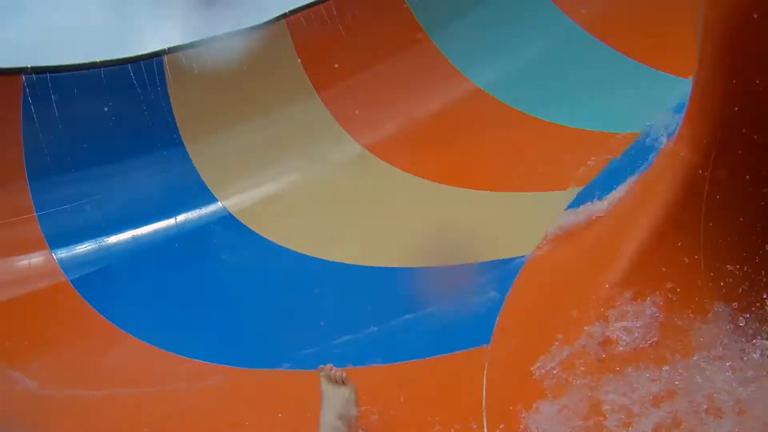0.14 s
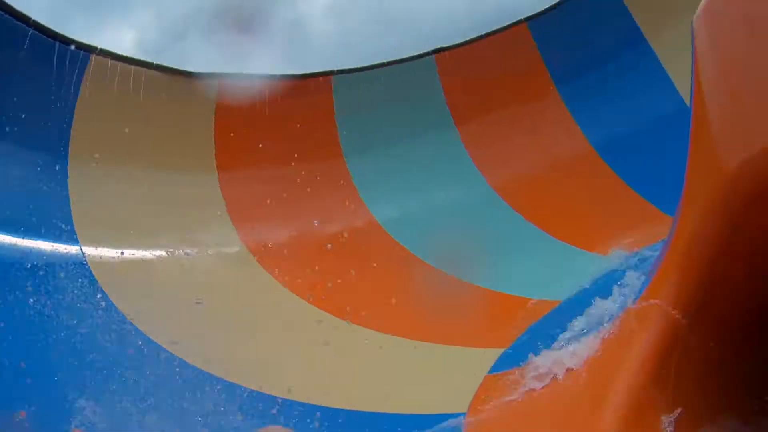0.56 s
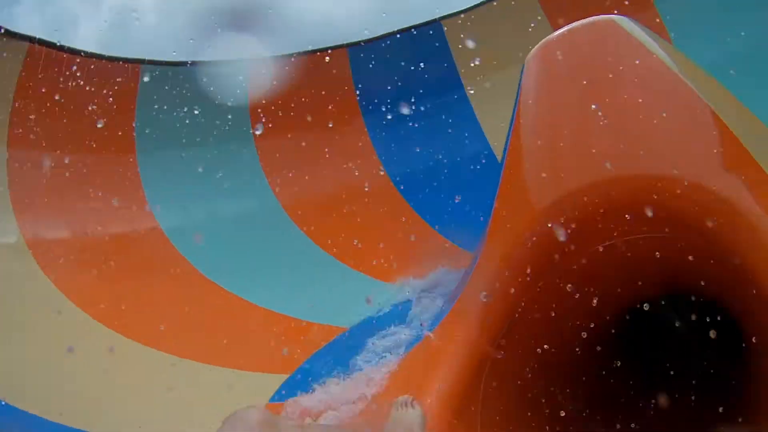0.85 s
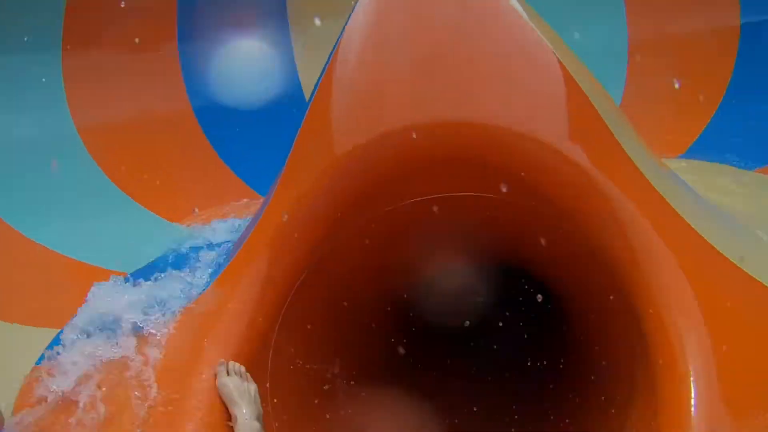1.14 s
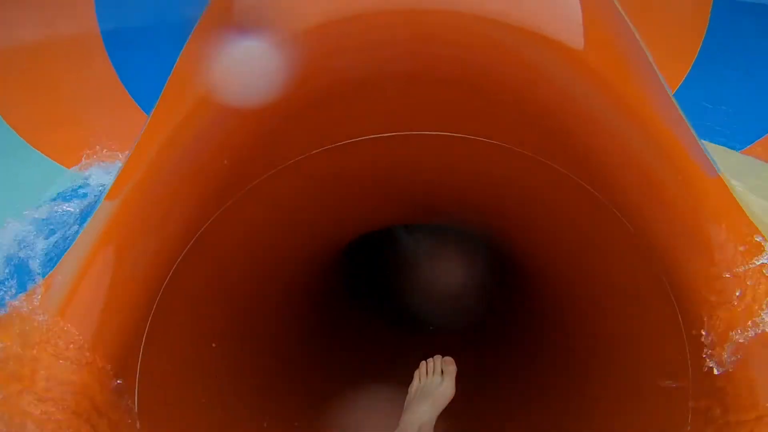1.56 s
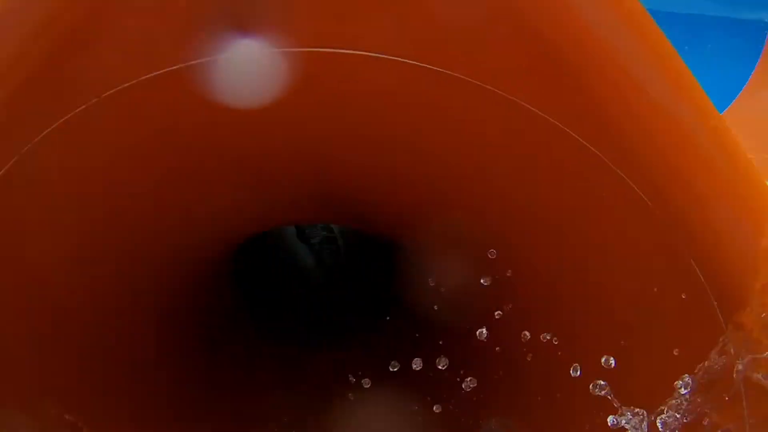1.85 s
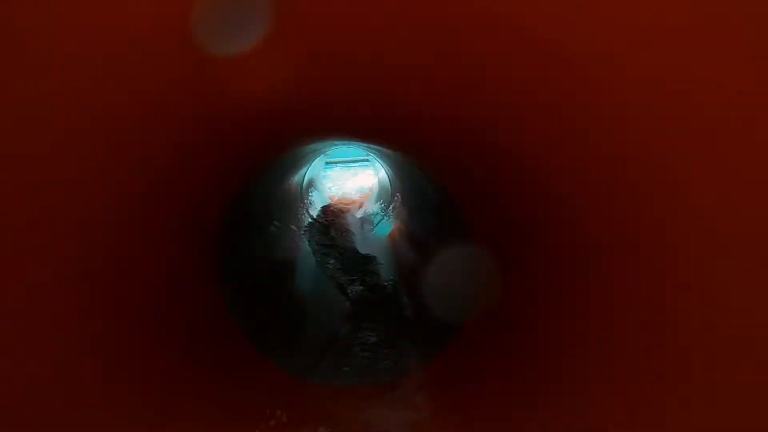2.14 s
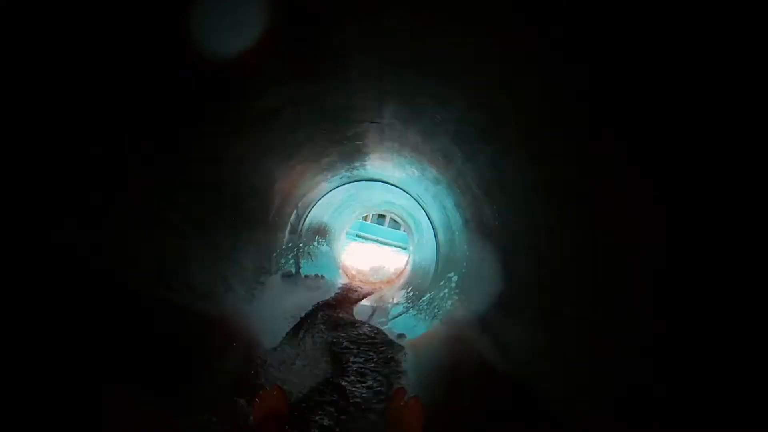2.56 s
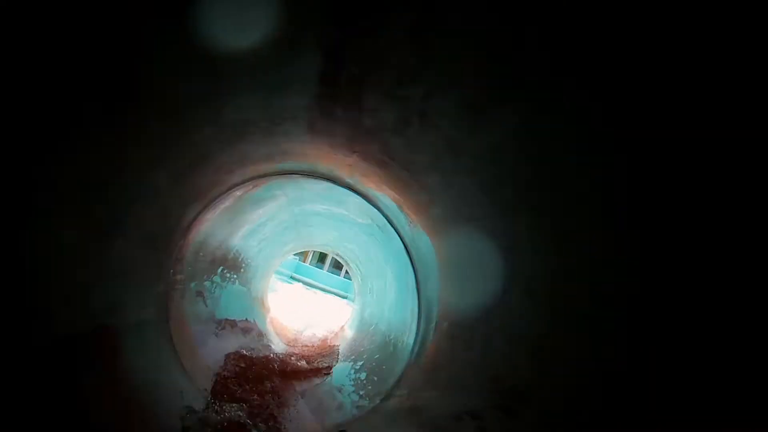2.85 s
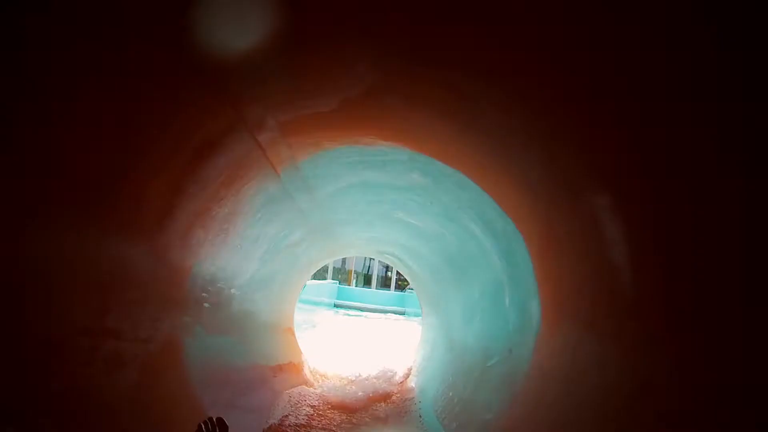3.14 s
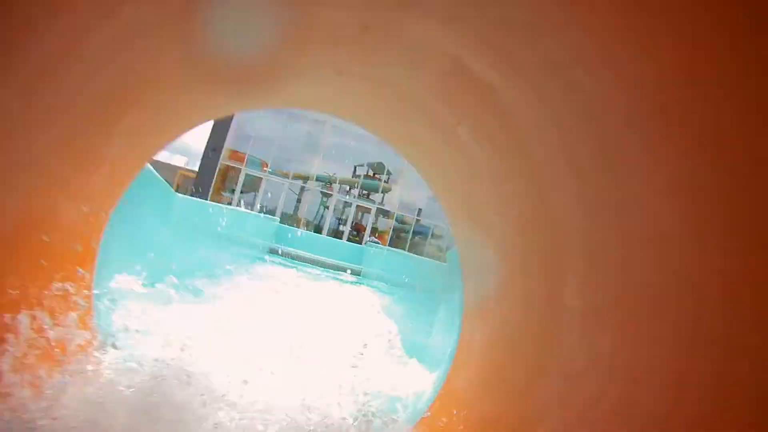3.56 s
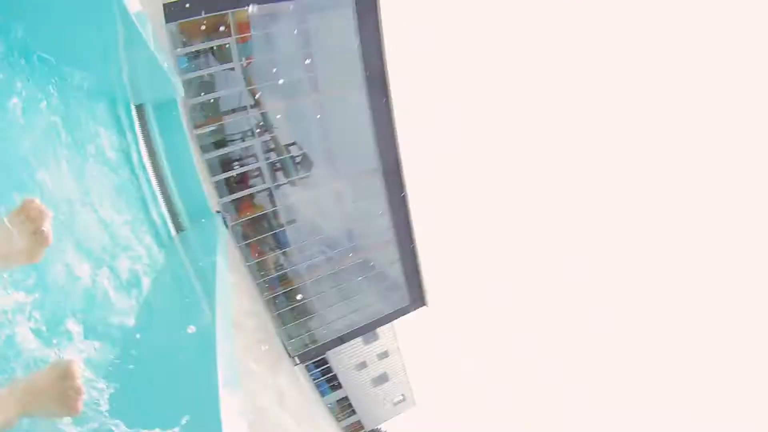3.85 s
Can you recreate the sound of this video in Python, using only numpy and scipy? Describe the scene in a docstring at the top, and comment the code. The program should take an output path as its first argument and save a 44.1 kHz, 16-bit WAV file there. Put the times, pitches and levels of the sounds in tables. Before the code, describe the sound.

Hissing water slide rush through a wet camera microphone, growing louder in the tube, ending in knocks and splashes

```python
"""A small waterproof camera rides a water slide from a bowl through a tube to the exit pool.
All along, shaped noise and tiny clicks make water hissing through the resonant microphone port.
Short rings plink, dry ticks crack early on, and smooth pulses are the air and spray that shove
the membrane, which thumps over low buffeting and goes deaf for some milliseconds.
At the exit, ragged noise bursts are splashes slapping the camera."""
import sys
import numpy as np
from scipy import signal
from scipy.fft import rfft, irfft, next_fast_len
from scipy.io import wavfile
from scipy.ndimage import uniform_filter1d, map_coordinates

SR = 44100
rng = np.random.default_rng(int(sys.argv[2]) if len(sys.argv) > 2 else 0)


def natural_amplitude(level_db):
    """Convert a level in decibels to a linear amplitude factor, elementwise."""
    exponent = np.asarray(level_db, float) / 20
    return 10 ** exponent


def master(y):
    """Save y as 16-bit WAV."""
    cut = np.clip(np.atleast_2d(y).T, -1, 1)
    pcm = np.round(cut * 32767)  # scale
    wavfile.write(sys.argv[1], SR, pcm.astype(np.int16))


N = 176400

# Colour of sound through the resonant port: frequency_hz, density_db (per Hz, relative)
PORT_COLOUR = [(80, -30), (250, -16.5), (900, -15.5), (1480, -12.5), (1620, -21.5), (2300, -20.5),
               (2550, -13.5), (3000, -9), (4150, -11), (4800, -6.5), (5600, 0.5), (6250, -6.5), (6850, -2),
               (7650, -7.5), (9200, -6), (13500, -18), (14000, -14.5), (14150, -60)]
DULL_LOW_HZ, DULL_HIGH_HZ = 1560, 2410  # edges of the dull band of the rush


def unit(x):
    """Scale to rms 1."""
    return x / np.sqrt(np.mean(x ** 2) + 1e-20)


def filtered(x, response):
    """Multiply the spectrum of x by a response that is a function of frequency in Hz."""
    m = next_fast_len(N + 8192)
    return irfft(rfft(x, m) * response(np.fft.rfftfreq(m, 1 / SR)), m)[:N]


def coloured(x, points):
    """Shape x by (Hz, dB) points on a log frequency axis, at rms 1."""
    f, db = np.transpose(points)

    def response(hz):
        return natural_amplitude(np.interp(np.log(hz + 1), np.log(f + 1), db, right=-120))

    return unit(filtered(x, response))


def noise():
    """White noise over the whole scene."""
    return rng.standard_normal(N)


def wobble(rate):
    """A smooth random curve through rate random knots a second."""
    knots = rng.standard_normal(int(N * rate / SR) + 4)
    return map_coordinates(knots, [np.arange(N) * rate / SR])


def patches(shape, bins, frames):
    """A random time-frequency field, smoothed over bins and frames, at rms 1."""
    across_pitch = uniform_filter1d(rng.standard_normal(shape), size=bins, axis=0)
    return unit(uniform_filter1d(across_pitch, size=frames, axis=1))


def window(start_s, length_ms, edge_ms):
    """A gate that opens to 1 from start_s for length_ms, with soft edges."""
    t = (np.arange(N) / SR - start_s) * 1000
    rise = np.clip(np.minimum(t, length_ms - t) / edge_ms + .5, 0, 1)
    return rise ** 2 * (3 - 2 * rise)


def rush():
    """Rushing water: patchy hiss and droplet fizz, with surges of spray, all through the port."""
    spectrum = signal.stft(noise() + fizz(), nperseg=512)[2]
    patchy_db = 1.5 * patches(spectrum.shape, bins=3, frames=10)
    spectrum = spectrum * natural_amplitude(patchy_db + tint_db(spectrum.shape[1]))
    hiss = coloured(signal.istft(spectrum, nperseg=512)[1][:N], PORT_COLOUR)
    flutter_db = 0.75 * wobble(60)
    return holes(hiss) * np.sqrt(rush_power()) * natural_amplitude(flutter_db)


def fizz():
    """Tiny droplet ticks: random clicks of uneven strength inside the rush."""
    ticks_per_s, level_db, spread_db = 1500, -8.5, 1  # level relative to the white noise of the hiss
    falls = rng.random(N) < ticks_per_s / SR
    clicks = falls * noise() * natural_amplitude(spread_db * noise())
    return natural_amplitude(level_db) * unit(clicks)


def tint_db(frames):
    """The colour of the rush drifts as the port wets: a slow gain in each of three bands."""
    # Drift: time_s, below_dull_db, dull_band_db, main_resonance_db
    drift = [(1.5, 0.5, 0.5, 0), (2.7, -0.5, 0.5, 0), (3.3, -1, 1, 1.5), (3.85, 0, 2, -1.5)]
    hz = np.fft.rfftfreq(512, 1 / SR)
    below = hz < DULL_LOW_HZ
    dull = (hz > DULL_LOW_HZ) & (hz < DULL_HIGH_HZ)
    main = (hz > 4900) & (hz < 6140)
    time_s, *gains_db = np.transpose(drift)
    at = np.linspace(0, N / SR, frames)
    return sum(np.outer(band, np.interp(at, time_s, db)) for band, db in zip([below, dull, main], gains_db))


def rush_power():
    """The flow swells and sinks; surges of spray close by add their power to it."""
    # Rushing water: time_s, level_db
    flow_levels = [(0, -53.5), (0.221, -54), (.93, -56.5), (1.53, -54), (1.66, -52), (2.0, -45.5),
                   (2.25, -45.5), (2.84, -46.5), (3.22, -50), (3.28, -45.5), (3.42, -48.5), (3.432, -42.5),
                   (3.62, -41), (3.76, -45.5), (3.8, -50.5), (3.86, -53), (4, -51.5)]
    # Spray close by: start_s, length_ms, level_db
    spray_surges = [(2.06, 17, -40.5), (2.312, 16, -53), (3.428, 58, -41.5)]
    power = natural_amplitude(2 * np.interp(np.arange(N) / SR, *np.transpose(flow_levels)))
    for start_s, length_ms, level_db in spray_surges:
        power += natural_amplitude(2 * level_db) * window(start_s, length_ms, 1.5)
    return power


def holes(x):
    """A spectral effect laid on the hiss: gates thin gaps in the dull band where a random field dips low."""
    threshold_sd, depth_db = -.8, -30
    hz, _, spectrum = signal.stft(x, SR, nperseg=2048)
    sparse = patches(spectrum.shape, bins=4, frames=4) < threshold_sd
    dull = (hz > DULL_LOW_HZ) & (hz < DULL_HIGH_HZ)
    return signal.istft(spectrum * natural_amplitude(depth_db * (dull[:, None] & sparse)), nperseg=2048)[1][:N]


def shoves():
    """Air and spray push the membrane: one-sided pulses, slower to fall, through a bass cut."""
    # Pushes: peak_s, push (thousandths of full scale ahead of gain and bass cut, sign = direction),
    # width_ms (twice the time from half height to the peak)
    pushes = [(0.1707, -3.5, 2.9), (0.2327, -12.5, 0.8), (0.248, 6, 1.9), (0.295, -5.5, 1.9),
              (0.3988, 6, 1.77), (0.6432, 3, 2.9), (0.759, 2.5, 2.5), (0.9755, 2, 2.2), (1.176, 3, 1.25),
              (1.2296, 4.5, 2.3), (1.299, 10.5, 2.3), (1.3084, -4.5, 2.8), (1.379, 4, 1.9),
              (1.5911, -5, 2.5), (1.5954, -7.5, 1.16), (1.607, 4.5, 3.5), (1.6514, -4.5, 0.66),
              (1.6745, -6.5, 3.1), (2.0042, -12.5, 2.2), (2.019, 8.5, 0.98), (2.03, -9, 2.6),
              (2.0337, 12.5, 2.6), (2.061, -7.5, 1.6), (2.1735, 8.5, 3.1), (2.2044, -17.5, 1.2),
              (2.2127, 9, 2.8), (2.239, -8.5, 1.7), (2.243, -7, 1.7), (2.2718, 17.5, 1.12),
              (2.3216, 24.5, 1.23), (2.4203, -13.5, 3), (2.4444, 5.5, 1.9), (2.539, -5.5, 2.7),
              (2.6455, -20, 0.86), (2.6585, 7, 1.26), (2.7633, -4, 3.6), (3.087, -6, 1.1),
              (3.267, 4.5, 2.9), (3.5756, -17, 1.15), (3.5833, 8, 2.2), (3.6347, -28, 1.57),
              (3.6528, -9, 1.9), (3.69, -6.3, 2.2), (3.7477, 11.5, 0.94), (3.7837, -29, 0.82),
              (3.7946, 28, 0.84), (3.8237, -24, 1.24), (3.8285, 14, 0.92), (3.8336, -15, 2.1),
              (3.841, 13, 1.5), (3.8466, -40, 0.43), (3.849, 27, 0.53), (3.8507, -22, 0.98),
              (3.8532, 17, 1.2), (3.872, 9, 1.1), (3.8932, 34, 0.4), (3.9088, -31, 0.93), (3.9405, 13, 1.1)]
    gain_db, fall_over_rise, bass_cut_hz = 4.5, 1.62, 141
    t_ms = np.arange(-1000, 1000) / SR * 1000
    stretch = np.where(t_ms > 0, fall_over_rise, 1)
    out = np.zeros(N + 2000)
    for peak_s, push, width_ms in pushes:
        pulse = np.exp(-np.log(16) * (t_ms / (width_ms * stretch)) ** 2)
        out[round(peak_s * SR):][:len(t_ms)] += push / 1000 * natural_amplitude(gain_db) * pulse
    return filtered(out[1000:][:N], lambda hz: 1j * hz / (bass_cut_hz + 1j * hz))


def membrane_hearing():
    """The pinned membrane goes deaf: a gain that dips for milliseconds; overlapping dips multiply."""
    # Deaf spells: start_s, length_ms, depth_db
    deaf_spells = [(0.2335, 13.5, -24), (0.2619, 31.7, -48), (0.3996, 3.3, -20), (1.5959, 6.9, -15),
                   (1.6274, 23.2, -66), (1.675, 8.5, -23), (2.0057, 13.3, -20), (2.0364, 23.8, -29),
                   (2.052, 8.6, -36.5), (2.0802, 16.8, -24.5), (2.205, 5.3, -25), (2.2498, 22.3, -35),
                   (2.2772, 35.5, -73), (2.3282, 31.4, -21), (2.33, 15.4, -50.0), (2.3489, 12.5, -48.5),
                   (2.3915, 8.0, -13), (2.437, 6.5, -21), (2.6465, 10.6, -15), (3.576, 6, -20),
                   (3.6417, 7.6, -17.5), (3.6757, 8.7, -33), (3.6957, 14, -28.5), (3.7895, 3.5, -11),
                   (3.7957, 28, -21), (3.807, 13, -37), (3.8257, 3.0, -14), (3.8355, 3.8, -27),
                   (3.894, 14, -14), (3.895, 7, -16), (3.9103, 29.6, -44), (3.944, 18.5, -31.5)]
    hearing = np.ones(N)
    for start_s, length_ms, depth_db in deaf_spells:
        hearing *= 1 - (1 - natural_amplitude(depth_db)) * window(start_s, length_ms, edge_ms=0.48)
    return hearing


def slaps():
    """Water slaps the housing: ragged broadband noise in short bursts."""
    # Slaps: start_s, length_ms, level_db
    slap_bursts = [(3.758, 2.8, -39), (3.7619, 2, -37), (3.766, 11.9, -30), (3.782, 5.9, -27.5),
                   (3.83, 2.4, -39), (3.8422, 1.6, -38), (3.847, 6, -43), (3.938, 5.8, -53.5)]
    # Colour of a slap: frequency_hz, density_db (per Hz, relative)
    slap_colour = [(100, -17.5), (1100, -4), (1600, -2), (2400, -13), (5400, -5.5), (13100, -15),
                   (14500, -28)]
    lumps_db = 5 * wobble(700)
    ragged = unit(coloured(noise(), slap_colour) * natural_amplitude(lumps_db))
    return ragged * sum(natural_amplitude(db) * window(s, ms, edge_ms=0.57) for s, ms, db in slap_bursts)


def plinks():
    """Droplets plink in the wet port: short sine rings with a soft onset, cut after 600 samples."""
    # Plinks: start_s, level_db (ahead of fade and onset), pitch_hz
    plink_drops = [(0.811, -52, 1560), (0.8847, -53, 1610), (1.002, -54, 1450), (1.175, -52.5, 300),
                   (1.653, -52, 452), (3.433, -48, 980), (3.6627, -40.5, 1486), (3.989, -44.5, 1500)]
    fade_cycles = 31  # cycles to fade 60 dB
    out, t = np.zeros(N + 600), np.arange(600) / SR
    for start_s, level_db, pitch_hz in plink_drops:
        fade = natural_amplitude(level_db - 60 * t * pitch_hz / fade_cycles)
        onset = 1 - np.exp(-t * pitch_hz)
        out[round(start_s * SR):][:len(t)] += fade * np.sin(2 * np.pi * pitch_hz * t) * onset
    return out[:N]


def ticks():
    """Droplets tick dry on the housing: a fast-fading ring buried in a crack coloured by the port."""
    # Ticks: start_s, level_db (ahead of fade, of the mean of ring and crack), pitch_hz (brightness)
    tick_drops = [(.742, -38.5, 6450), (0.784, -38, 3100), (.819, -41, 9000), (1.004, -44, 10600),
                  (1.086, -37, 6100), (1.225, -41, 6950)]
    t60_s = .008
    out, t = np.zeros(N + 600), np.arange(600) / SR
    crack = coloured(noise(), PORT_COLOUR)
    for start_s, level_db, pitch_hz in tick_drops:
        first = round(start_s * SR)
        ring = np.sin(2 * np.pi * pitch_hz * t)
        mixed = (ring + crack[first:][:len(t)]) / 2
        out[first:][:len(t)] += natural_amplitude(level_db - 60 * t / t60_s) * mixed
    return out[:N]


def shove_power(thumps):
    """Power of the shoves, smeared around each one by two moving averages."""
    span = round(0.021 * SR)
    return np.abs(uniform_filter1d(uniform_filter1d(thumps ** 2, span), span))


def gurgle(busy, hearing):
    """Water works in the port around each shove: rough mid noise that follows the shove power."""
    # Colour of the gurgle: frequency_hz, density_db (per Hz, relative)
    gurgle_colour = [(150, -4), (400, 0), (1000, -17)]
    below_shoves_db = -19.5
    rough = unit(coloured(noise(), gurgle_colour) * natural_amplitude(5.8 * wobble(80)))
    return hearing * natural_amplitude(below_shoves_db) * np.sqrt(busy) * rough


def buffet(busy, hearing):
    """Lumpy low air noise on the port, swelling around shoves, partly muted by the pinned membrane."""
    # Colour of air on the port: frequency_hz, density_db (per Hz, relative)
    air_colour = [(18, -0.5), (40, 6), (120, -5), (300, -10), (800, -54)]
    floor_db, below_shoves_db, mute_share = -73, -12, 0.25
    lumps = unit(coloured(noise(), air_colour) * natural_amplitude(4 * wobble(25.14)))
    power = natural_amplitude(2 * floor_db) + natural_amplitude(2 * below_shoves_db) * busy
    return lumps * np.sqrt(power) * (1 - mute_share * (1 - hearing))


def scene():
    """The pinned membrane mutes the airborne sound; its own thumps stay at full level."""
    hearing = membrane_hearing()
    thumps = shoves()
    busy = shove_power(thumps)
    airborne = hearing * (rush() + slaps() + plinks() + ticks())
    low = buffet(busy, hearing) + gurgle(busy, hearing)
    return np.tile(airborne + thumps + low, (2, 1))


def low_pass(x):
    """Removes everything above the highest recorded frequency."""
    return signal.sosfilt(signal.butter(12, 15280, fs=SR, output="sos"), x)


def record(dry):
    """The membrane saturates softly, treble ends at a band limit; one microphone feeds both channels."""
    ceiling, top_hz = .1, 15000  # ceiling as a share of full scale, ahead of the band limit
    saturated = dry[0] / (1 + np.abs(dry[0] / ceiling) ** 4) ** (1 / 4)
    limited = filtered(saturated, lambda hz: hz < top_hz)
    return low_pass(np.tile(limited, (2, 1)))


dry = scene()
out = record(dry)
master(out)
```